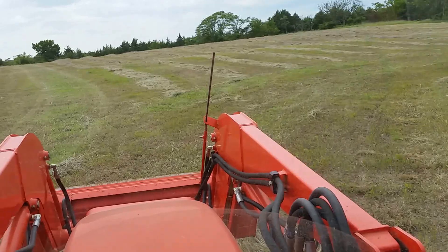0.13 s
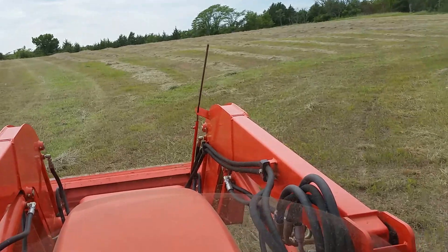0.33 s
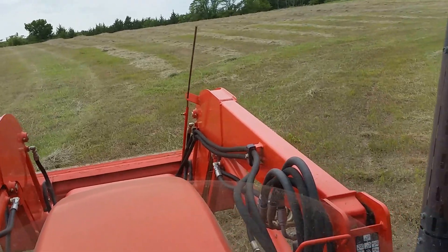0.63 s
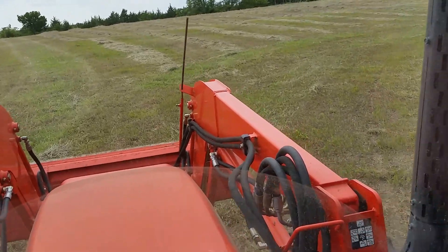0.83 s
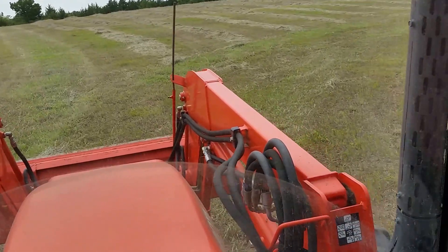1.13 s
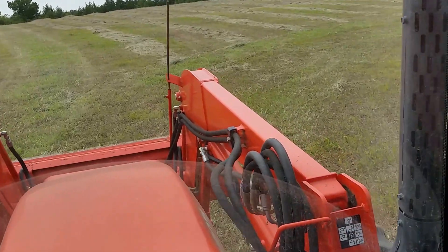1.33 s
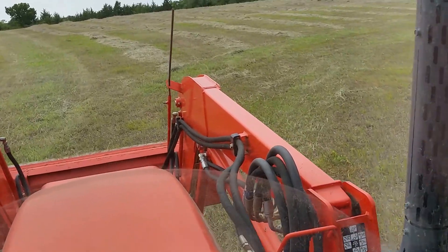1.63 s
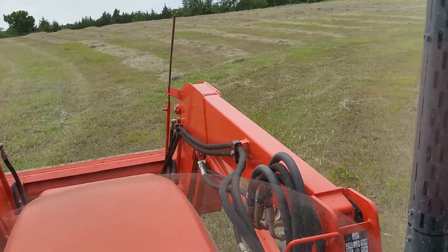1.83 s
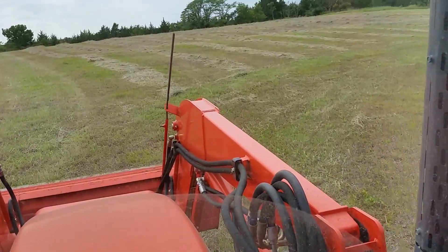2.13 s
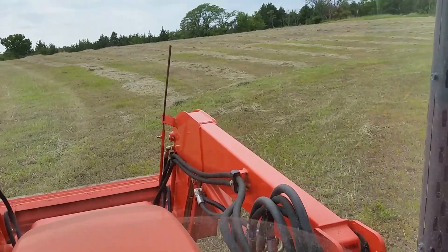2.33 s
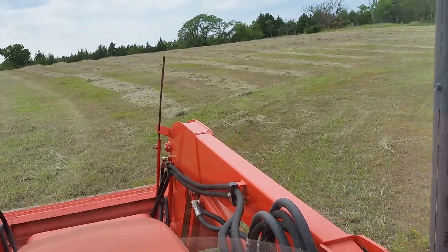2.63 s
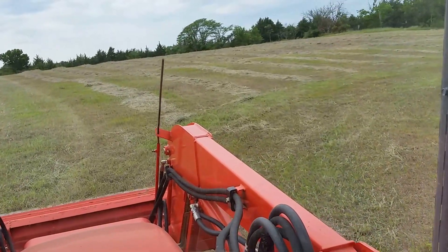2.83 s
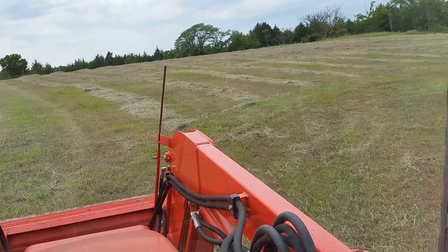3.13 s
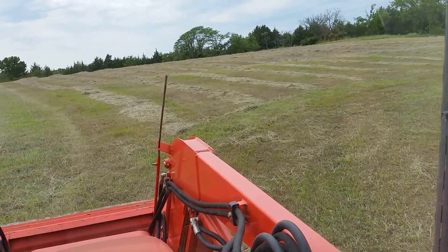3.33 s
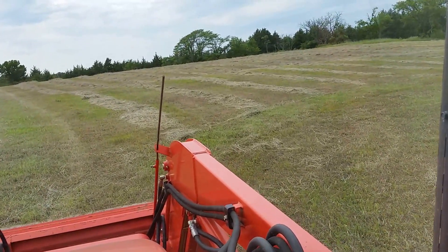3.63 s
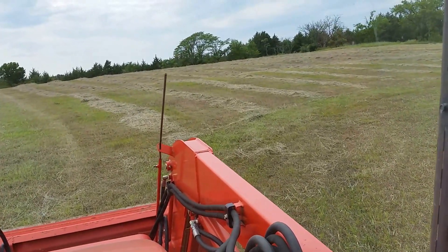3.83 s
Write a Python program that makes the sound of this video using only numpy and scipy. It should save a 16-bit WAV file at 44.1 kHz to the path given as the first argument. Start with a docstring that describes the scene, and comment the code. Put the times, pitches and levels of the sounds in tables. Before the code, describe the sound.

Steady low tractor engine hum inside a closed cab, with faint vent hiss and rattles.

```python
"""A tractor's four-cylinder diesel hums, heard from inside the closed cab. Each turning part makes
tones at multiples of its speed. A faster, belt-driven unit (probably the air-conditioning compressor)
makes a loud boom, a gear sings and a hydraulic pump whines. Engine noise comes through the panels,
the cab rumbles and fan air hisses from the vents. It all fades in together, then soft rattles join."""
import sys
import numpy as np
from scipy import signal
from scipy.fft import rfft, irfft, next_fast_len
from scipy.io import wavfile
from scipy.ndimage import uniform_filter1d, minimum_filter1d

SR = 44100
rng = np.random.default_rng(int(sys.argv[2]) if len(sys.argv) > 2 else 0)


def master(y):
    """Save y as 16-bit WAV."""
    cut = np.clip(np.atleast_2d(y).T, -1, 1)
    pcm = np.round(cut * 32767)  # scale
    wavfile.write(sys.argv[1], SR, pcm.astype(np.int16))


N = 176400

# Speeds of the engine's crankshaft and the belt-driven unit (time [s], speed [turns per second])
CRANK_SPEED = [(0, 36.31), (4, 36.31)]
BELT_SPEED = [(0, 55.05), (4, 55.05)]
# Tones of each part (multiple of its turn or pulse rate [times], level [dB], left minus right [dB])
ENGINE_TONES = [(2, -27, 0), (4, -24, 0), (5, -38, 1), (6, -35.5, 0), (8.5, -40, 0), (9, -41, 0),
                (11, -39, 0), (13, -41, -1), (14, -47, -1), (14.5, -47, -1), (15, -48, -1), (15.5, -48, -1),
                (16, -48, -1), (16.5, -48, -1), (17, -43, -1), (22.5, -47, -2), (44, -53.5, -4)]
RING_TONES = [(26, -45, -2), (27, -51, -3), (28, -49, -3), (30, -55, -4), (35, -61, -4), (36, -56, -4)]
BOOM_TONES = [(.5, -35, 0), (1, -21, -.2), (2, -11, -.8), (3, -19.7, .5), (4.5, -36, 0), (5, -35.5, 0)]
PUMP_TONES = [(2, -37.5, -1), (3, -43, -1), (4, -47, -3), (5, -49.5, -5)]
# Gain added to the engine's high ring, the gear tone and the pump's top tone (time [s], gain [dB])
RING_GAIN = [(.5, -1), (.95, 0), (1.3, 6), (1.55, 6), (1.9, -1), (2.6, -2), (4, -3)]
GEAR_GAIN = [(0.6, -36), (0.64, -43), (1.89, -36.5), (2.09, -42), (2.16, -55), (2.19, -37), (2.6, -46),
             (2.76, -31), (2.8, -42.5), (3.39, -34), (3.86, -48), (3.95, -33)]
WHINE_GAIN = [(.5, -55), (2, -58), (2.75, -51), (3.1, -54), (3.3, -47), (3.6, -45), (3.75, -55), (4, -55)]
# How strong each noise is from bass to treble (frequency [Hz], relative level [dB])
PANEL_SPECTRUM = [(120, -36), (200, -5), (311, -0.5), (357, -9.5), (392, -5), (430, -6.5), (461, -4.5),
                  (555, -15.5), (684, -7), (751, -14), (883, -11), (1080, -14.5), (1340, -17), (2850, -27),
                  (3200, -37), (4160, -59.5), (7040, -120)]
RUMBLE_SPECTRUM = [(11, -44), (18, -14), (30, -9), (41, -20), (48, -24), (65, -11), (91, -3.5), (114, -3.5),
                   (129, 1.5), (143, 5.5), (156, -2), (177, -7.5), (191, -26.5), (207, -37), (240, -21),
                   (310, -55), (530, -120)]
AIR_SPECTRUM = [(1530, -28.5), (2600, -4.5), (2840, -2.5), (3260, -4.5), (5380, -10.5), (7370, -19.5),
                (9020, -13.5), (11700, -16), (14200, -19), (15600, -21.5)]
RATTLE_SPECTRUM = [(1500, -120), (3500, -20), (5000, -9), (7500, -12), (9300, 0), (12000, 0), (14000, -4),
                   (15500, -10)]
# How each noise rises and falls around its average (time [s], relative level [dB])
PANEL_SWELL = [(0.7, -27), (0.74, -25), (0.78, -29), (0.8, -27.5), (3.23, -29), (3.48, -27), (3.57, -28),
               (4.0, -28.5)]
RUMBLE_SWELL = [(0.7, -16.5), (0.87, -23.5), (1.08, -11), (1.17, -26.5), (1.4, -9), (1.44, -23),
                (2.12, -15), (2.43, -26.5), (2.64, -15), (2.71, -16.5), (2.91, -10), (2.94, -19.5),
                (3.84, -14), (3.95, -17)]
AIR_SWELL = [(.7, -54), (1.01, -53.5), (1.04, -55.5), (1.7, -54.5), (2.06, -55), (2.4, -54.5), (2.8, -54.5),
             (2.98, -56.5), (3.1, -54.5), (3.95, -55.5)]
# Soft rattles in the cab (start time [s], relative level [dB])
RATTLE_HITS = [(.61, -56), (.74, -56), (.93, -56), (1.29, -56), (1.36, -57), (1.7, -56), (2.1, -54),
               (2.18, -55), (2.265, -53), (2.48, -53), (2.63, -56), (2.76, -57), (3.055, -52), (3.4, -57),
               (3.66, -57)]
# How alike the sound is at the two ears (frequency [Hz], likeness [-1 to 1])
EAR_LIKENESS = [(20, .999), (70, 1), (140, 0.98), (215, 0.68), (320, 1), (470, 0.35), (590, 0.84),
                (740, 0.34), (870, 0.43), (1000, -0.3), (1700, -0.17), (2500, -0.044)]
# Which way the noises lean (frequency [Hz], left minus right [dB])
EAR_BALANCE = [(60, -2.5), (140, 0.5), (330, 1), (500, -1), (770, -2), (1170, -2.5), (1790, -6), (2740, 2),
               (4190, 7.5), (6410, 8), (9810, -2), (15000, -6.5)]


def amp(db):
    """Turn decibels into a factor to multiply by."""
    return 10 ** (np.asarray(db) / 20)


def unit(x):
    """Scale a signal to an average power of 1."""
    return x / np.sqrt(np.mean(x ** 2) + 1e-20)


def along(points, hz):
    """Read a table at these frequencies, on a log scale."""
    freqs, values = np.transpose(points)
    return np.interp(np.log(hz + 1), np.log(freqs + 1), values)


def curve(rows):
    """Join a table's points in time, one value per sample."""
    times, values = np.transpose(rows)
    return np.interp(np.arange(N) / SR, times, values)


def swell(rows):
    """A level curve with its average taken away."""
    level_db = curve(rows)
    return level_db - level_db.mean()


def wobble(rate):
    """A random curve through `rate` points a second."""
    points = rng.standard_normal(int(N * rate / SR) + 2)
    return np.interp(np.arange(N) * rate / SR, np.arange(len(points)), points)


def filtered(x, response):
    """Scale each frequency in x by response(hz)."""
    size = next_fast_len(N + SR // 2)
    return irfft(rfft(x, size) * response(np.fft.rfftfreq(size, 1 / SR)), size)[..., :N]


def width(hz):
    """An angle that grows as the two ears sound less alike."""
    return np.arccos(np.clip(along(EAR_LIKENESS, hz), -1, 1)) / 2


def noise(spectrum, patchy_db):
    """Stereo noise of power 1, with random louder and softer patches in time and pitch."""
    grid = signal.stft(rng.standard_normal((2, N)), nperseg=512)[2]
    patches = uniform_filter1d(rng.standard_normal(grid.shape[1:]), size=8, axis=0)
    patches = unit(uniform_filter1d(patches, size=12, axis=1))
    pair = signal.istft(grid * amp(patchy_db * patches), nperseg=512)[1][:, :N]
    mid, side = filtered(pair, lambda hz: amp(along(spectrum, hz)) * [np.cos(width(hz)), np.sin(width(hz))])
    ears = np.array([mid + side, mid - side])
    return unit(filtered(ears, lambda hz: amp(np.outer([.5, -.5], along(EAR_BALANCE, hz)))))


def shaft_angle(speed):
    """How far a shaft has turned, in radians."""
    return 2 * np.pi * np.cumsum(curve(speed)) / SR


def tones(angle, rows, wander_db, rate, slip_rad, smear_rad=None):
    """Tones at multiples of a turning speed; level and phase drift `rate` times a second."""
    out = np.zeros((2, N))
    for multiple, db, pan_db in rows:
        hz = multiple * angle[-1] * SR / N / (2 * np.pi)
        ear_shift = width(hz) * wobble(3.02) * [[1], [-1]]
        start = rng.uniform(0, 2 * np.pi) if smear_rad is None else smear_rad * multiple ** 2
        phase = multiple * angle + start + slip_rad * wobble(rate) + ear_shift
        level = amp(db + wander_db * wobble(rate))
        pan = amp([[pan_db / 2], [-pan_db / 2]])
        out += level * pan * np.sqrt(2) * np.cos(phase)
    return out


def engine_hum(crank):
    """The turning crankshaft makes a hum, with a high ring that swells and sinks."""
    hum = tones(crank, ENGINE_TONES, wander_db=2, rate=5, slip_rad=.42)
    ring = tones(crank, RING_TONES, wander_db=1, rate=7, slip_rad=.22)
    return hum + amp(curve(RING_GAIN)) * ring


def belt_boom():
    """The belt-driven unit booms in the cab, each pulse smeared out in time."""
    angle = shaft_angle(BELT_SPEED)
    return tones(angle, BOOM_TONES, wander_db=1.1, rate=12, slip_rad=.19, smear_rad=-1.05)


def gear_tone(crank):
    """A gear sings at 24 times the crank speed, coming and going."""
    return amp(curve(GEAR_GAIN)) * tones(crank, [(24, -1, -2)], wander_db=1.2, rate=9, slip_rad=.5)


def pump_whine(crank):
    """The pump's quick pulses make a whine; the tone at six times their rate swells with load."""
    angle = 6.33 * crank  # pulses per crank turn
    top = tones(angle, [(6, 4, -5)], wander_db=1.2, rate=6, slip_rad=.3)
    lower = tones(angle, PUMP_TONES, wander_db=2.5, rate=14, slip_rad=1)
    return lower + amp(curve(WHINE_GAIN)) * top


def panel_noise(crank, level_db=-24.5, pulse_depth=.13):
    """Engine noise comes through the panels, pulsing with the two firings in each turn."""
    pulse = 1 + pulse_depth * (np.cos(2 * crank) + .38 * np.cos(crank))
    level = amp(level_db + swell(PANEL_SWELL) + .21 * wobble(12))
    return level * pulse * noise(PANEL_SPECTRUM, patchy_db=.92)


def cab_rumble(level_db=-19):
    """A low, lumpy rumble fills the cab."""
    return amp(level_db + swell(RUMBLE_SWELL)) * noise(RUMBLE_SPECTRUM, patchy_db=-1.35)


def vent_hiss(level_db=-42.5):
    """Fan air hisses from the vents with a slight flicker."""
    flicker_db = .44 * wobble(14) + .62 * np.abs(wobble(25))
    return amp(level_db + swell(AIR_SWELL) + flicker_db) * noise(AIR_SPECTRUM, patchy_db=.7)


def rattles(rise_s=.006, fall_s=.022):
    """Each rattle is a short, soft burst of bright noise."""
    starts, levels_db = np.transpose(RATTLE_HITS)
    age = np.clip(np.arange(N) / SR - starts[:, None], 0, None)
    bursts = (1 - np.exp(-age / rise_s)) * np.exp(-age / fall_s)
    return 2 * amp(levels_db) @ bursts * noise(RATTLE_SPECTRUM, patchy_db=2)


def scene():
    """Add up the sounds; one crankshaft keeps the engine, gear and pump in step."""
    crank = shaft_angle(CRANK_SPEED)
    machines = engine_hum(crank) + belt_boom() + gear_tone(crank) + pump_whine(crank)
    return machines + panel_noise(crank) + cab_rumble() + vent_hiss() + rattles()


def record(dry, fade_start_s=.36, fade_end_s=.65, ceiling=.94, top_hz=15730):
    """Fade in, turn down peaks that pass the ceiling, then cut the highest treble."""
    faded = dry * np.clip((np.arange(N) / SR - fade_start_s) / (fade_end_s - fade_start_s), 0, 1)
    safe_gain = np.minimum(1, ceiling / (np.abs(faded).max(axis=0) + 1e-9))
    span = round(.012 * SR)  # smooth the gain over 12 ms
    gain = uniform_filter1d(minimum_filter1d(safe_gain, size=span), size=span)
    return filtered(faded * gain, lambda hz: hz < top_hz)


dry = scene()
out = record(dry)
master(out)
```